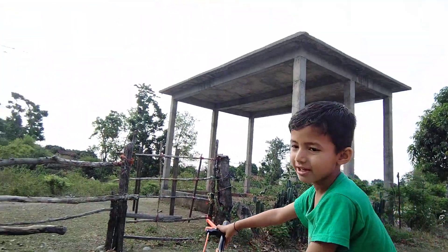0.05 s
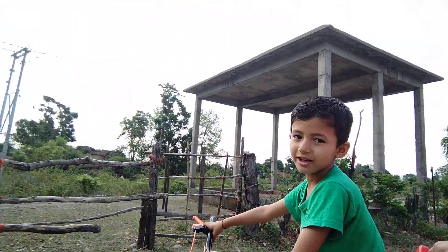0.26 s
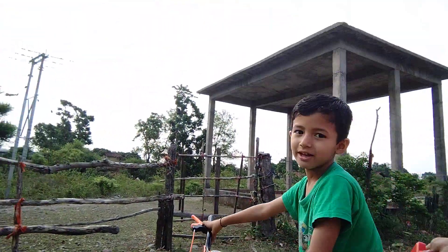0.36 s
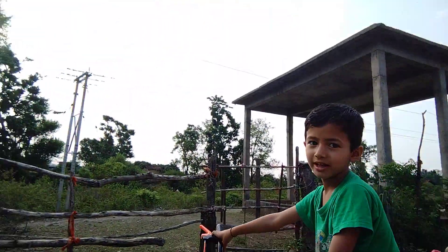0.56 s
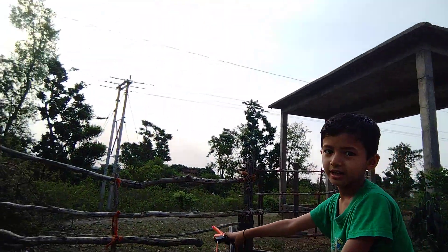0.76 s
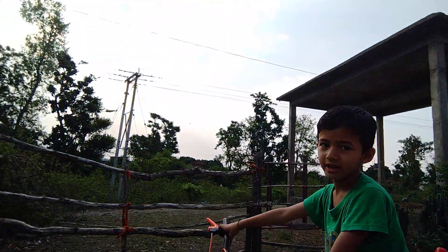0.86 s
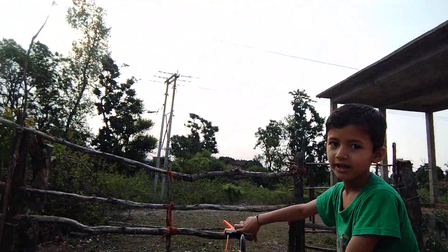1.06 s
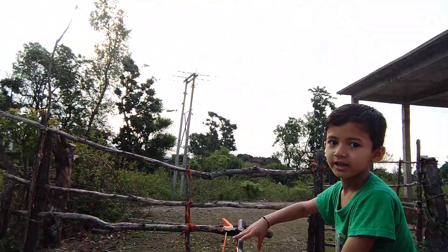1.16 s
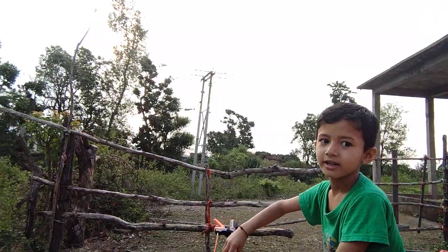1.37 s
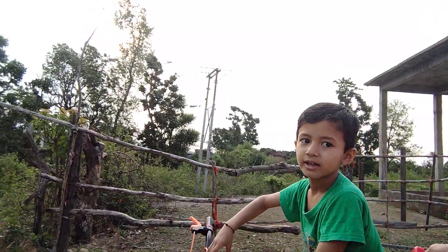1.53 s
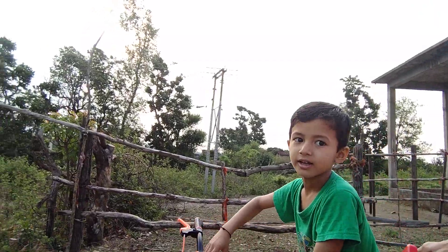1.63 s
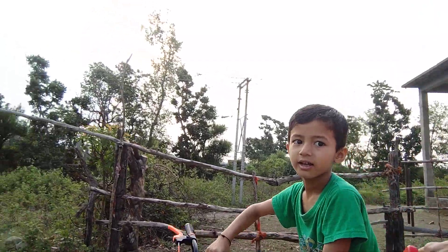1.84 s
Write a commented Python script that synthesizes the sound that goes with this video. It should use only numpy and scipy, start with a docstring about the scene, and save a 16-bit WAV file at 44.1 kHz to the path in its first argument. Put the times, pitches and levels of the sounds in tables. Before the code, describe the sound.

A small bicycle bell dings brightly outdoors, rings on, then is damped amid faint clicks and knocks.

```python
"""A small bicycle bell rings in a yard: the striker brushes the dome, hits it and bounces, and a hand stops the ring.
The bicycle is shifted on dry ground with ticks, knocks and a scrape, while far birds whistle and short pips sound.
The bell and knocks are fading sine waves, the birds and pips are short sine notes, and the ticks, scrape,
outdoor rumble and rustle are noise shaped in pitch and time."""
import sys
import numpy as np
from scipy import signal
from scipy.fft import rfft, irfft
from scipy.io import wavfile

SR = 44100
rng = np.random.default_rng(int(sys.argv[2]) if len(sys.argv) > 2 else 0)


def pcm_store(signal):
    """Save signal as 16-bit PCM."""
    levels = np.round(np.clip(np.atleast_2d(signal), -1, 1) * 32767)
    wavfile.write(sys.argv[1], SR, levels.astype(np.int16).T)


N = 83790

# Tones of the bell dome, each a close pair that beats. Each row: pitch in Hz, how far the partner lies
# above it in Hz, first dip of the beat in seconds, partner level in dB, waver of the partner from 0 to 1.
DOME_MODES = [(1818.5, 1.2, .6, -18, 0), (4225.4, -13.1, .044, -5, .8), (6996.8, 4.4, .185, -8, 0),
              (7137.5, -4.0, .135, -.5, 0), (10264, 14, .04, -18, 0), (10584, 20, .05, -20, 0),
              (14080, 30, .02, -22, 0), (14570, 25, .06, -16, 0)]
# Time each of these tones takes to fade by 60 dB. Each entry: seconds, in the order of the dome tones.
DOME_T60_S = [3.12, 1.99, 1.46, 0.52, .36, 0.15, .32, 0.16]
# Blows of the striker, each on another spot. Each row: start in seconds, shift of the beats in seconds,
# level of the crack in dB before its trim, then the level of each dome tone in dB.
STRIKER_BLOWS = [(0.225, 0.033, -37, -41.5, -38.5, -73, -51.5, -65, -49, -54, -40),
                 (0.2387, -0.04, -34.5, -52, -45, -45.5, -47.5, -67, -45, -38, -30),
                 (0.3519, 0.057, -27, -33, -48, -29.5, -43, -57, -37, -35, -21.5),
                 (0.3574, -0.0074, -27, -31.5, -35.5, -29.5, -46, -49, -38, -46, -23.5),
                 (0.385, -0.0012, -25, -29, -37.5, -39, -39.5, -51.5, -37.5, -47, -27)]
# Colour of the striker's crack. Each row: frequency in Hz, level in dB per Hz.
CRACK_COLOUR = [(300, -36.5), (1200, -8.5), (2300, 12), (3500, -11.5), (6000, -10), (9000, -29),
                (13000, -1), (16000, -24)]
CONTACT_S = .0007  # the ring fades in, and out at the next blow, over this time
HAND_S, HAND_T60_S = 1.457, 0.26  # when the hand touches the dome, and the 60 dB fade it adds
WAVER_HZ, WAVER_PEAK_S, PARTNER_FADE_DB_PER_S = 3.65, .035, 7
CRACK_TRIM_DB, CRACK_T60_S = -0.5, 0.015
TAIL_DB, TAIL_T60_S = -16.5, .12  # the yard returns a weaker, longer wash of each crack

# Ticks of the shifted bicycle. Each row: start in seconds, level in dB before the common trim,
# dullness in dB per octave, time to fade by 60 dB in seconds.
BICYCLE_TICKS = [(0.7121, -46, -9, 0.036), (0.732, -47.5, -2, 0.037), (0.7676, -48, -7, 0.046),
                 (0.78, -51, -4, 0.03), (0.8006, -48, -3, 0.05), (0.8264, -45.5, -5, 0.042),
                 (0.8474, -46, -5, 0.037), (0.8704, -47, -4, 0.052), (0.8932, -45, 4, 0.05),
                 (0.9075, -46, 27, 0.072), (0.929, -54, 10, 0.05), (0.9466, -50, -1, 0.064),
                 (0.961, -44.5, 9, 0.064), (0.9823, -44.5, -2, 0.061), (1.0156, -40.5, 7, 0.093),
                 (1.1023, -41, 6, 0.056), (1.1162, -49, 3.0, 0.036), (1.137, -54, 0, 0.046),
                 (1.1563, -39, 6.5, 0.053), (1.1876, -41, 6.5, 0.057), (1.2244, -48, 12, 0.044),
                 (1.2265, -44, 14, 0.077), (1.2384, -47, 12, 0.054), (1.257, -55, 9, 0.05),
                 (1.294, -50, 12, 0.017), (1.309, -35, 2.5, 0.058), (1.5505, -50.5, 2.5, 0.047),
                 (1.5993, -52, 7, 0.15), (1.6603, -53, 8, 0.11), (1.7389, -46, 15, 0.04)]
# Colour of the ticks before their dullness. Each row: frequency in Hz, level in dB per Hz.
TICK_COLOUR = [(400, -40), (1200, -4), (2500, -0.5), (3800, -1.5), (5200, -2.5), (6000, -2), (7100, 1.5),
               (9000, -15.5), (11500, -15.5), (14500, -9.5), (16000, -6)]
TICK_TRIM_DB, TICK_ATTACK_S = -1.5, .0015
# Knocks with one clear pitch. Each row: start in seconds, level in dB, pitch in Hz,
# number of cycles in which it fades by 60 dB.
BICYCLE_KNOCKS = [(.325, -21, 1910, 7.0), (.326, -41, 730, 5.6), (0.508, -30.5, 894, 4.2),
                  (.516, -38.5, 3030, 7.0), (.537, -26.5, 1020, 6.4), (0.537, -30, 2400, 20.0),
                  (1.0418, -25, 2100, 12.0), (1.066, -27, 2340, 12.0), (.985, -34, 6000, 32),
                  (1.083, -29, 700, 8.7), (1.083, -28.5, 3520, 14.0), (1.102, -50, 5100, 30),
                  (1.118, -61, 5100, 27), (1.139, -46, 5150, 37), (1.228, -44, 4830, 30.0),
                  (1.241, -37, 3530, 30), (1.257, -44, 2700, 12.0), (1.294, -32, 5930, 18),
                  (1.313, -34, 2920, 53), (1.598, -42.5, 2890, 107), (1.634, -40, 2050, 29),
                  (1.75, -37.5, 2700, 11.7), (1.798, -44.5, 2230, 12), (1.811, -45, 341, 26)]
# Loudness of the scrape over time. Each row: time in seconds, level in dB.
SCRAPE_LEVEL = [(.97, -59), (1.005, -51), (1.02, -44), (1.03, -61), (1.039, -50), (1.043, -38.5),
                (1.06, -37.5), (1.076, -43.5), (1.081, -43), (1.095, -62), (1.13, -78)]
# Colour of the scrape. Each row: frequency in Hz, level in dB per Hz.
SCRAPE_SPECTRUM = [(180, -57.5), (300, -29.5), (1170, -5), (1300, 0.5), (1690, -11.5), (2140, 2.5),
                   (3240, -12.5), (6850, -18), (9240, -39.5), (16000, -33.5)]
SCRAPE_GRAINS_PER_S = 9000

# Notes of the bird phrase. Each row: start within the phrase in seconds, length in seconds,
# first pitch in Hz, last pitch in Hz, glide time in seconds, level in dB relative to the phrase.
PHRASE_NOTES = [(0.0, .05, 3100, 3720, .022, 0.0), (.078, .028, 3900, 4400, .035, -3),
                (.103, .026, 4300, 5080, .013, -4)]
# Each time the phrase is sung. Each row: start in seconds, level in dB.
BIRD_PHRASES = [(.046, -54), (.41, -53), (.766, -52)]
# Single faint whistles of other birds. Each row: start in seconds, length in seconds,
# first pitch in Hz, pitch aimed for in Hz, glide time in seconds, level in dB.
BIRD_WHISTLES = [(0.549, 0.071, 2300, 2734, 0.093, -46.5), (1.36, 0.056, 2480, 2500, .04, -54.5),
                 (1.721, 0.053, 3235, 3410, 0.038, -54.5), (1.867, 0.029, 2960, 3030, 0.027, -65)]
FLUTTER_DB = 2.5
# Short pips. Each row: start in seconds, peak level in dB, pitch in Hz.
SHORT_PIPS = [(0.0333, -42, 1566), (0.8426, -43, 1550), (1.1033, -54, 1550), (1.1543, -60, 1530),
              (1.2164, -41, 1530), (1.6786, -40, 1540), (1.7295, -43.5, 1576), (1.8267, -49, 1580),
              (1.8632, -47, 1500)]
PIP_S = .011

# Colours of the outdoor layers, from low to high. Each row: frequency in Hz, level in dB per Hz.
RUMBLE_COLOUR = [(22, -57.5), (32, -39), (48, -9.5), (75, 2), (110, -0.5), (160, -8.5), (250, -12),
                 (400, -23), (700, -39.5)]
THRUM_COLOUR = [(200, -24.5), (280, -8.5), (335, 2.5), (420, -8.5), (650, -3.5), (900, -15.5),
                (1200, -25.5), (1600, -39.5)]
RUSTLE_COLOUR = [(600, -20.5), (1000, -2), (1500, 4.5), (2400, 0.5), (3200, -5.5), (5000, -18), (7500, -52),
                 (9000, -47), (16000, -50.5)]
HISS_COLOUR = [(3000, -8), (4500, -1.5), (7000, -5.5), (8500, -19), (10000, -30), (16500, -36.5)]
FIZZ_COLOUR = [(7000, -40), (9000, -14.5), (12000, -7), (15000, -1), (16500, -4.5)]
# Loudness of these layers over time. Each row: time in seconds, level in dB.
THRUM_CURVE = [(0, -63.5), (.1, -67.5), (.15, -71.5), (.215, -67), (.26, -55.5), (.33, -64.5), (.46, -72.5),
               (.56, -64), (.72, -69.5), (.9, -55.5), (1.06, -55.5), (1.15, -64.5), (1.32, -64),
               (1.43, -74.5), (1.52, -83.5), (1.64, -59), (1.75, -67.5), (1.9, -68.5)]
RUSTLE_CURVE = [(0, -48.5), (.06, -59.5), (.13, -68), (.21, -64), (.24, -56.5), (.32, -53), (.4, -50.5),
                (.47, -59.5), (.56, -55), (.68, -57), (.85, -51), (.98, -50.5), (1.1, -47), (1.25, -56.5),
                (1.34, -58), (1.5, -61.5), (1.58, -58), (1.68, -58), (1.9, -56.5)]
HISS_CURVE = [(0, -59.5), (.08, -70), (.14, -85), (.18, -92), (.22, -92), (.24, -64), (.37, -67), (.5, -74),
              (.7, -75.5), (.8, -66), (.95, -68.5), (1.08, -74), (1.2, -77), (1.33, -74.5), (1.42, -73),
              (1.52, -76.5), (1.6, -72), (1.75, -77.5), (1.9, -82)]
FIZZ_CURVE = [(0, -65), (.08, -81), (.12, -101), (.22, -94), (.24, -78), (.37, -76), (.45, -95),
              (.7, -96.5), (.8, -71.5), (.95, -64), (1.08, -77), (1.12, -84), (1.33, -81.5), (1.45, -92.5),
              (1.9, -104.5)]
RUMBLE_DB, RUSTLE_GRAINS_PER_S = -60, 12000


def from_db(db):
    """Turn a level in dB into a gain."""
    return 10 ** (np.asarray(db) / 20)


def rms_one(x):
    """Scale a sound to an average (rms) level of 1."""
    return x / np.sqrt(np.mean(x ** 2) + 1e-20)


def in_time(rows):
    """Join rows of time and value into a curve with a value at every sample."""
    return np.interp(np.arange(N) / SR, *np.transpose(rows))


def coloured(x, spectrum, tilt_db=0.0):
    """Filter by a colour table, with an extra fall of tilt_db per octave that is zero at 6 kHz."""
    hz = np.maximum(np.arange(len(x) // 2 + 1) * SR / len(x), 10)
    table_hz, table_db = np.transpose(spectrum)
    colour_db = np.interp(np.log(hz), np.log(table_hz), table_db)
    # the tilt stays constant below 2500 Hz
    fall_db = tilt_db * np.log2(np.maximum(hz, 2500) / 6000)
    return irfft(rfft(x) * from_db(colour_db - fall_db), len(x))


def drift(rate):
    """Smooth random wander of spread 1, made by low-passing noise near rate Hz."""
    r = np.exp(-2 * np.pi * rate / SR)
    noise = rng.standard_normal(N + SR)
    # the first second is dropped so that the filter has settled
    return rms_one(signal.lfilter([1], [1, -2 * r, r * r], noise)[SR:])


def add(out, s, sound):
    """Mix a sound in at time s."""
    i = int(s * SR)
    out[i:i + len(sound)] += sound[:max(N - i, 0)]


def burst(spectrum, db, t60, tilt_db=0.0, attack=0.00038):
    """Coloured noise that starts fast and dies away, like a sharp contact."""
    t = np.arange(4096) / SR
    noise = rms_one(coloured(rng.standard_normal(len(t)), spectrum, tilt_db))
    fade = from_db(db - 60 * t / max(t60, .003))
    return np.minimum(t / attack, 1) * fade * noise


def patchy(spectrum, patchy_db, rate, grains=SR):
    """Coloured grains (plain noise when dense) whose half-octave bands flicker each on their own."""
    sparse = rng.standard_normal(N) * (rng.random(N) < grains / SR)
    spec = rfft(rms_one(coloured(sparse, spectrum)))
    hz = np.arange(N // 2 + 1) * SR / N
    edges = 20 * 2 ** np.arange(0, 10.5, .5)
    out = np.zeros(N)
    for lo, hi in zip(edges, edges[1:]):
        # bands far outside the colour table are skipped
        if spectrum[0][0] < 1.5 * hi and lo < spectrum[-1][0]:
            band = irfft(spec * (hz >= lo) * (hz < hi), N)
            out += band * from_db(patchy_db * drift(rate))
    return out


def bell():
    """Each blow cracks and sets pairs of close tones beating until the next blow; a hand damps the last."""
    out, time = np.zeros(N), np.arange(N) / SR
    ends = [blow[0] for blow in STRIKER_BLOWS[1:]] + [N / SR]
    for (s, shift, crack_db, *levels), end in zip(STRIKER_BLOWS, ends):
        t = time[:int((end - s + CONTACT_S) * SR)]
        gate = np.clip(t / CONTACT_S, 0, 1) * np.clip(1 - (t + s - end) / CONTACT_S, 0, 1)
        hand_db = 60 * np.maximum(t + s - HAND_S, 0) / HAND_T60_S
        for (hz, split, dip, partner_db, waver), t60, db in zip(DOME_MODES, DOME_T60_S, levels):
            partner = from_db(partner_db - PARTNER_FADE_DB_PER_S * t)
            partner *= 1 + waver * np.cos(2 * np.pi * WAVER_HZ * (t - WAVER_PEAK_S))
            # the partner cancels the first tone most at the dip of the beat
            partner_tone = partner * np.sin(2 * np.pi * (hz * t + split * (t - dip - shift)))
            pair = np.sin(2 * np.pi * hz * t) - partner_tone
            add(out, s, gate * pair * from_db(db - 60 * t / t60 - hand_db))
        crack = burst(CRACK_COLOUR, crack_db + CRACK_TRIM_DB, CRACK_T60_S)
        tail = burst(CRACK_COLOUR, crack_db + TAIL_DB, TAIL_T60_S, tilt_db=4.0, attack=0.0045)
        add(out, s, crack + tail)
    return out


def ticks():
    """Small contacts of the shifted bicycle: short noise bursts, each with its own dullness."""
    out = np.zeros(N)
    for s, db, dullness, t60 in BICYCLE_TICKS:
        add(out, s, burst(TICK_COLOUR, db + TICK_TRIM_DB, t60, dullness, TICK_ATTACK_S))
    return out


def knocks():
    """Pitched knocks: a sine wave that swells over one cycle and then rings down."""
    out, t = np.zeros(N), np.arange(2048) / SR
    for s, db, hz, cycles in BICYCLE_KNOCKS:
        fade = from_db(db - 60 * t * hz / cycles)
        add(out, s, np.minimum(t * hz, 1) * fade * np.sin(2 * np.pi * hz * t))
    return out


def scrape():
    """A gritty scrape: scattered random clicks, uneven in strength, coloured and faded in time."""
    grains = (rng.random(N) < SCRAPE_GRAINS_PER_S / SR) * rng.standard_normal(N)
    grains *= from_db(2.0 * drift(150))
    return from_db(in_time(SCRAPE_LEVEL)) * rms_one(coloured(grains, SCRAPE_SPECTRUM))


def birds():
    """Bird notes: sine waves that glide up, level off and flutter with distance."""
    out, flutter = np.zeros(N), from_db(FLUTTER_DB * drift(120))
    notes = list(BIRD_WHISTLES)
    for start, phrase_db in BIRD_PHRASES:
        for offset, length, from_hz, to_hz, glide, db in PHRASE_NOTES:
            notes.append((start + offset, length, from_hz, to_hz, glide, phrase_db + db))
    for s, length, from_hz, to_hz, glide, db in notes:
        i = int(s * SR)
        t = np.arange(min(int(length * SR), N - i)) / SR
        hz = from_hz + (to_hz - from_hz) * np.sin(np.pi / 2 * np.minimum(t / glide, 1))
        swell = from_db(db - 8 * t / length) * np.hanning(len(t)) ** .3
        add(out, s, swell * flutter[i:i + len(t)] * np.sin(2 * np.pi * np.cumsum(hz) / SR))
    return out


def pips():
    """Short pips: steady sine waves that swell and fade in a rounded shape."""
    out, t = np.zeros(N), np.arange(int(PIP_S * SR)) / SR
    for s, db, hz in SHORT_PIPS:
        add(out, s, from_db(db) * np.hanning(len(t)) * np.sin(2 * np.pi * hz * t))
    return out


def outdoor_air():
    """Outdoor background: five noise layers from low rumble to top fizz, each flickering band by band."""
    rumble = from_db(RUMBLE_DB) * patchy(RUMBLE_COLOUR, patchy_db=2.5, rate=13.0)
    thrum = from_db(in_time(THRUM_CURVE)) * patchy(THRUM_COLOUR, patchy_db=2.2, rate=14.0)
    rustle_grains = patchy(RUSTLE_COLOUR, patchy_db=3.0, rate=24.0, grains=RUSTLE_GRAINS_PER_S)
    rustle = from_db(in_time(RUSTLE_CURVE)) * rustle_grains
    hiss = from_db(in_time(HISS_CURVE)) * patchy(HISS_COLOUR, patchy_db=3.0, rate=57.0)
    fizz = from_db(in_time(FIZZ_CURVE)) * patchy(FIZZ_COLOUR, patchy_db=4.0, rate=40.0)
    return rumble + thrum + rustle + hiss + fizz


def scene():
    """Mix the bell, bicycle, birds and pips over the outdoor air, as one channel."""
    bicycle = ticks() + knocks() + scrape()
    return (bell() + bicycle + birds() + pips() + outdoor_air())[None]


def record(dry):
    """Take away the top treble: one filter cuts it steeply, a gentler one shelves it down."""
    steep_cut = signal.cheby2(14, 60, 16900, fs=SR, output="sos")
    shelf = signal.cheby2(6, 18, 15900, fs=SR, output="sos")
    return signal.sosfilt(shelf, signal.sosfilt(steep_cut, dry))


dry = scene()
out = record(dry)
pcm_store(out)
```